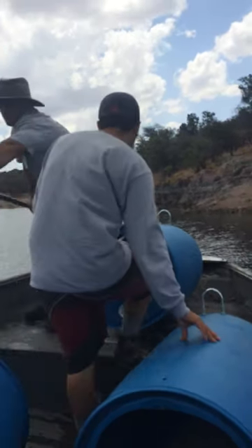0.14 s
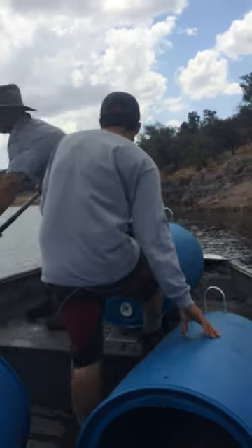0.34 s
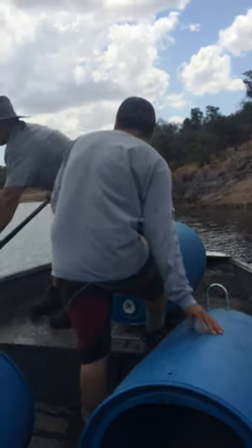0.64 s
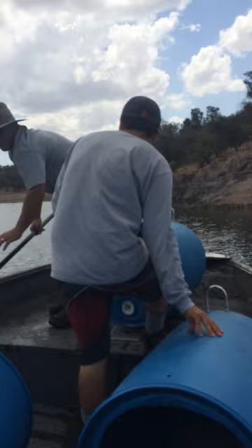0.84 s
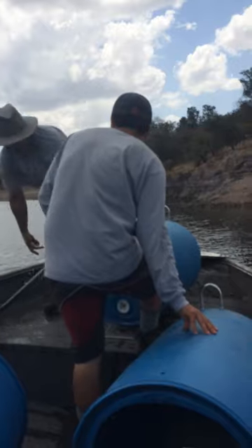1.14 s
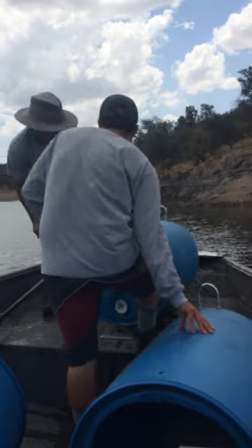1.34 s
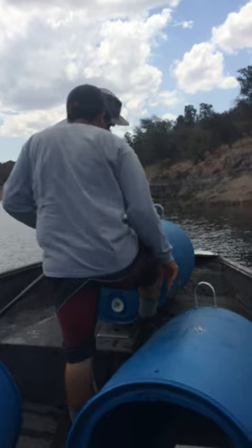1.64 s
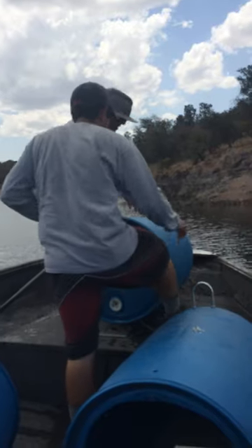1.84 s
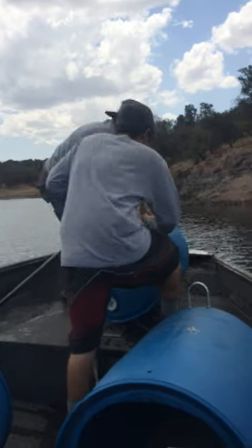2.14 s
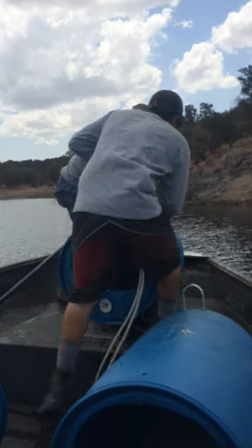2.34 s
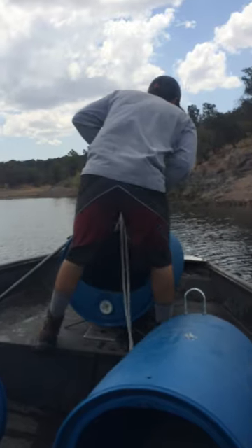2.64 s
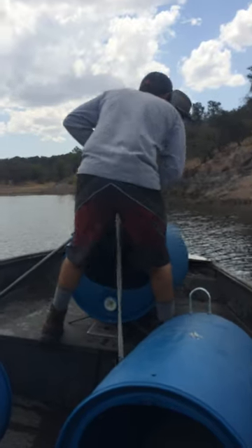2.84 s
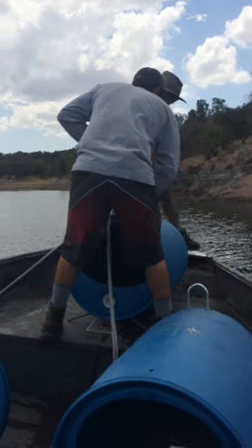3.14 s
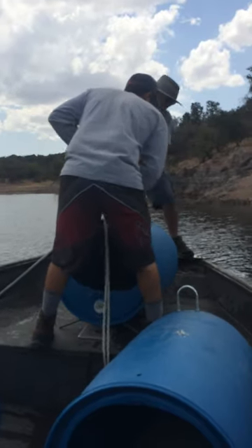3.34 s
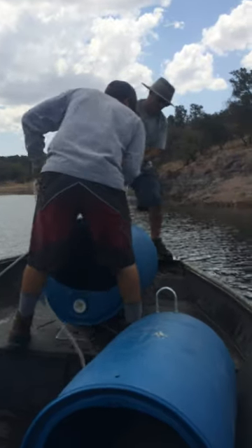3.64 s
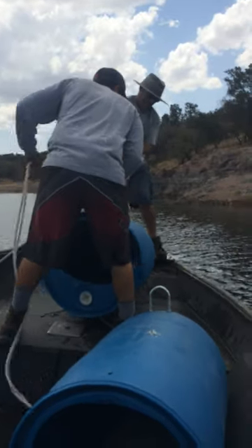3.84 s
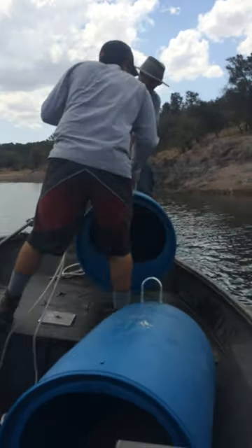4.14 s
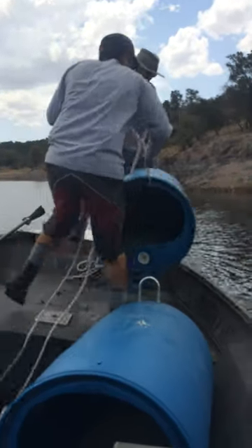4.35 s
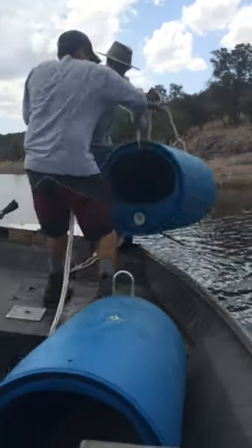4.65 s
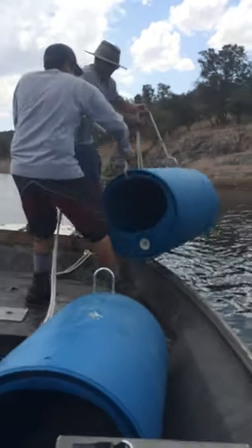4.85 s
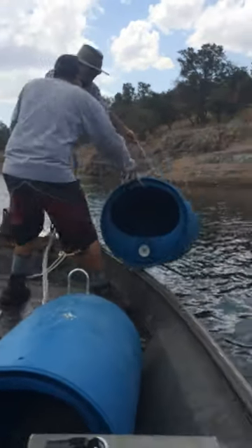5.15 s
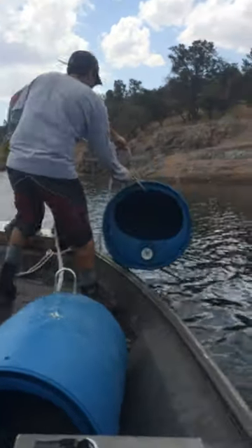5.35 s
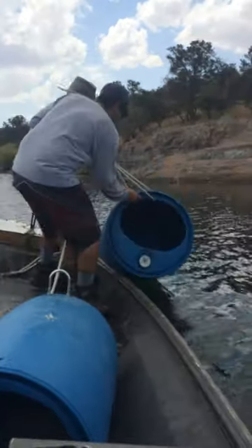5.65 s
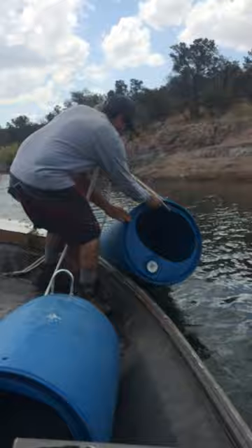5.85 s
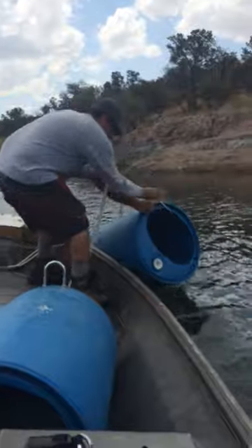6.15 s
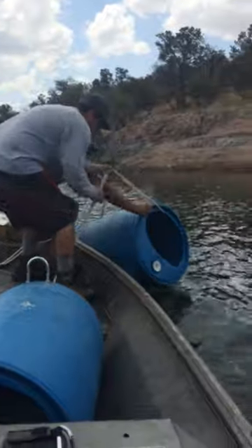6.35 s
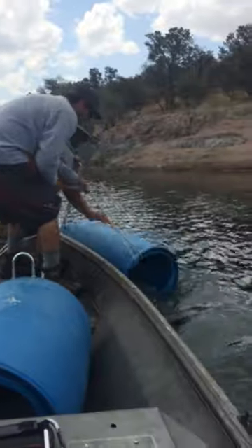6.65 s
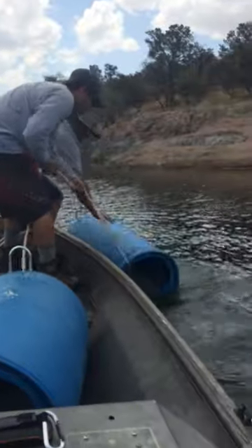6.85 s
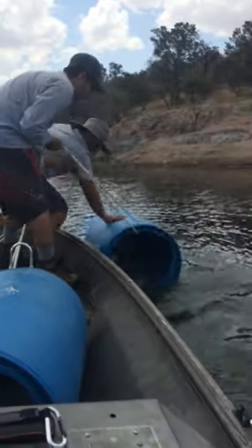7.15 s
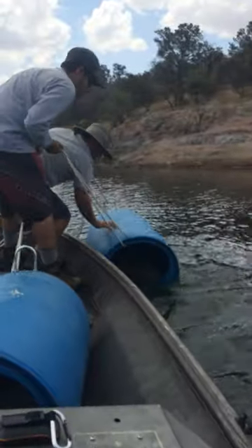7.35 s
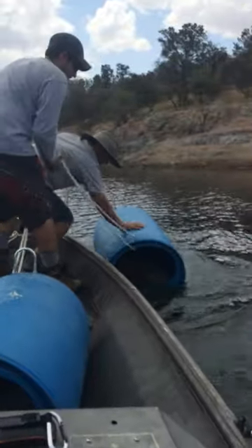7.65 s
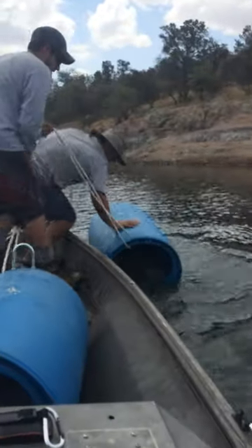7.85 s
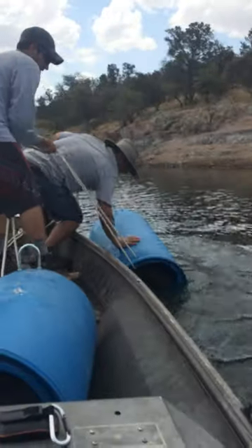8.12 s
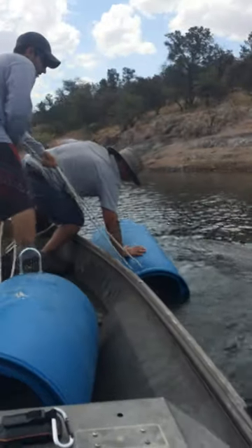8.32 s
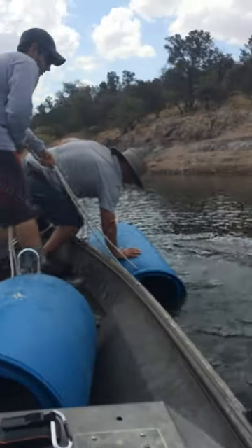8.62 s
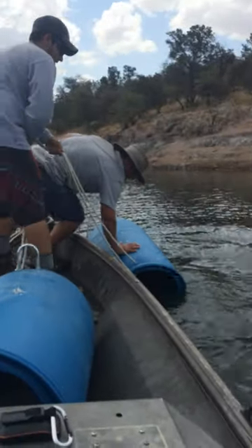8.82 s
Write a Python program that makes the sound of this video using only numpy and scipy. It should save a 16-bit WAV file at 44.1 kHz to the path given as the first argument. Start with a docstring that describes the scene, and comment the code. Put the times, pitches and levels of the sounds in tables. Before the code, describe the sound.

Very close, dry outdoor sound aboard a small metal boat. From 0 to 1.6 seconds, soft low thumps and deck rubbing surround hard hollow knocks, the strongest near 0.5 and 1.3, with short groans of dragged plastic near 0.9 and 1.4. From 1.7 to 3.6 it is much quieter: faint shuffles, taps and scuffs. Thumps gather from 3.7 to 4.9. At 5.0 a loud crack and deep boat boom begin gritty scraping, with another bang around 5.15 and thumps at 5.45. Thin squeaks chirp from 5.6 to 5.9; slow juddering slips begin at 6.0 and quicken to a rough squeal and sharp knock around 6.4. Water follows: small slaps and gurgling bubbles, strongest from 6.8 to 7.2, weaker at 7.5 and 7.7. Soft lapping, tiny ripple ticks and a wavering low hum remain until 9 seconds.

```python
"""A hollow plastic drum bangs and drags over a small metal boat as two people heave it into a lake.
Hard knocks and soft thumps set drum and hull ringing; friction, built from many tiny random clicks,
makes the drags, scuffs and scrapes; repeated slips judder on the gunwale, the boat's upper edge.
Then coloured noise and ringing bubbles splash and lap, over hull rumble and a low wavering hum."""
import sys
import numpy as np
from scipy import signal
from scipy.fft import rfft, irfft, next_fast_len
from scipy.io import wavfile
from scipy.ndimage import uniform_filter1d

SR = 44100
rng = np.random.default_rng(int(sys.argv[2]) if len(sys.argv) > 2 else 0)


def bounce(signal):
    """Save signal as a 16-bit WAV file at the path given by the first command-line argument."""
    frames = np.transpose(np.atleast_2d(signal))
    limited = np.clip(frames, -1, 1)
    pcm = np.round(limited * 32767).astype(np.int16)
    wavfile.write(sys.argv[1], SR, pcm)


N = 396018
TIME = np.arange(N) / SR  # seconds

# In every table t60_s is the time to fade by 60 dB, and levels are set before the trims in the functions.


def from_db(db):
    """Decibels to gain."""
    return 10 ** (np.asarray(db) / 20)


def rms_one(x):
    """Scale to an rms (average strength) of 1."""
    return x / np.sqrt(np.mean(x ** 2) + 1e-20)


def in_time(rows):
    """Each column of a curve, read at every sample."""
    s, *columns = np.transpose(rows)
    return [np.interp(TIME, s, c) for c in columns]


def during(rows):
    """1 while a curve lasts, 0 outside, with soft edges."""
    lasting = (TIME >= rows[0][0]) & (TIME <= rows[-1][0])
    return uniform_filter1d(1.0 * lasting, size=400)


def add(out, s, sound):
    """Mix a sound in at time s."""
    i = max(0, round(s * SR))
    out[i:i + len(sound)] += sound[:N - i]


def fade(t, t60):
    """Exponential decay, as a ringing object loses its energy."""
    return np.exp(-np.log(1000) * t / t60)


def drift(rate):
    """Smooth random wandering of rms 1; a higher rate wanders faster."""
    r = np.exp(-80 * np.pi * rate / SR)  # made at every 40th sample
    slow = signal.lfilter([1], [1, -2 * r, r * r], rng.standard_normal(N // 40 + 2002))[2000:]
    return np.interp(np.arange(N) / 40, np.arange(len(slow)), rms_one(slow))


def colour(x, spectrum):
    """Give a steady sound a spectrum with steep skirts; rms 1."""
    hz, db = np.transpose(spectrum)
    size = next_fast_len(len(x))
    octave, points = np.log2(np.fft.rfftfreq(size, 1 / SR) + 1), np.log2(hz)
    outside = np.abs(octave - np.clip(octave, points[0], points[-1]))
    gain = from_db(np.interp(octave, points, db) - 24 * outside)
    return rms_one(irfft(rfft(x, size) * gain, size)[:len(x)])


def ring(clicks, hz, t60):
    """Each unit click sets a sine of height 1 ringing."""
    r, w = from_db(-60 / (t60 * SR)), 2 * np.pi * hz / SR
    return signal.lfilter([0, np.sin(w)], [1, -2 * r * np.cos(w), r * r], clicks + 1e-18)


def grains(per_s, spread_db):
    """Random tiny clicks of uneven size and either sign."""
    sizes = from_db(spread_db * np.minimum(rng.exponential(1, N), 4)) * rng.choice([-1, 1], N)
    return sizes * (rng.random(N) < per_s / SR)


def patchy(x, depth_db, rate):
    """Half-octave bands swell and sink on their own, as contacts and droplets come and go."""
    size = next_fast_len(N)
    spectrum = rfft(x, size)
    place = 2 * np.log2(np.clip(np.fft.rfftfreq(size, 1 / SR) / 250, 1, 64))
    bands = (irfft(spectrum * np.maximum(0, 1 - np.abs(place - k)), size)[:N] for k in range(13))
    return rms_one(sum(band * from_db(depth_db * drift(rate)) for band in bands))


def friction(spectrum, per_s, spread_db, chatter_db, patchy_db):
    """Rubbing is many small catches, whose strength wanders."""
    catches = grains(per_s, spread_db) * from_db(chatter_db * drift(30.5))
    return patchy(colour(catches, spectrum), patchy_db, rate=18)


def strokes(rows, attack_s, release_t60):
    """Each row swells, holds for its length and dies away; one gain curve per level column."""
    out, t = np.zeros((len(rows[0]) - 2, N)), TIME[:SR]
    for s, length, *db in rows:
        shape = np.minimum(t / attack_s, 1) * fade(np.maximum(t - length, 0), release_t60)
        i = max(0, round(s * SR))
        out[:, i:i + SR] = np.maximum(out[:, i:i + SR], from_db(db)[:, None] * shape[:N - i])
    return out


# hard knocks: start_s, crack_db, boom_db, clang_db, ring_length (a factor)
HARD_KNOCKS = [(0.4656, -4, -8, -16.5, 1.0), (0.634, -23.5, -20.5, -30, 0.62),
               (1.0077, -23.5, -16, -25.5, 0.69), (1.1582, -32, -48, -68, 0.7),
               (1.2658, -4.5, -15, -14.5, 0.73), (1.2849, -10.5, -12, -42, 0.61),
               (1.3945, -25.5, -22, -31, 0.91), (1.5386, -13.5, -18.5, -21, 0.72),
               (1.5584, -19.5, -27, -33.5, 0.74), (2.0342, -35.5, -36.5, -49.5, 1.0),
               (2.8236, -27.5, -36, -30, 0.34), (2.969, -38, -57, -32.5, 0.26),
               (3.3456, -30.5, -64, -49.5, 0.54), (3.6349, -37, -41.5, -50, 0.94),
               (3.712, -26.5, -31.5, -32, 0.49), (3.8226, -28.5, -29.5, -35.5, 0.39),
               (3.957, -29, -65, -41, 0.5), (4.6704, -42, -40, -36.5, 0.63), (5.0109, -17, -17, -29, 0.87),
               (5.0225, -6, -27, -16, 0.24), (5.1463, -13, -10, -15.5, 0.38), (5.4472, -30, -20, -33, 1),
               (6.4222, -9, -27, -20.5, 0.55)]
# sound colours of the hollow boom, the clang and the crack: pitch_hz, level_db
HOLLOW_COLOUR = [(110, -28), (200, 0), (340, 2.5), (520, -17)]
CLANG_COLOUR = [(300, -14.5), (480, -7), (750, -1.5), (1150, -8), (1450, -5), (1900, -12), (2600, -22)]
CRACK_COLOUR = [(1400, 8), (2400, -7), (3200, 7.5), (4200, 8.5), (6500, 6.5), (10000, 0), (15500, -6.5)]


def knocks(boom_db=-2.0, clang_db=2.0, crack_db=-11.5, clang_t60=0.22, crack_t60=0.037,
           buzz_db=-5.5, buzz_t60=0.18, hollow_db=-3.5, hollow_t60=0.32):
    """Drum on metal: a sharp crack, a short buzz, the clang of dense modes and a hollow low boom."""
    out, t = np.zeros(N), TIME[:SR // 2]
    for s, crack, boom, clang, length in HARD_KNOCKS:
        white = rng.standard_normal((3, len(t)))
        hollow_shape = fade(t, hollow_t60 * length) * (1 - fade(t, 0.026))
        add(out, s, from_db(boom + hollow_db) * colour(white[2], HOLLOW_COLOUR) * hollow_shape)
        clang_shape = fade(t, clang_t60 * length) * (1 - fade(t, 0.0091))
        add(out, s, from_db(clang + clang_db) * colour(white[0], CLANG_COLOUR) * clang_shape)
        snap = fade(t, crack_t60 * length) + from_db(buzz_db) * fade(t, buzz_t60 * length)
        snap = snap * (1 - fade(t, 0.0066))
        add(out, s, from_db(crack + crack_db) * colour(white[1], CRACK_COLOUR) * snap)
    times, _, booms = np.transpose(HARD_KNOCKS)[:3]
    return out + body(times, from_db(booms + boom_db), soft_hz=3000, detune=0.0073)


# soft thumps of feet and drum wall: start_s, level_db, pitch_hz, pop_db, pop_pitch_hz
SOFT_THUMPS = [(0.03, -14.5, 91.5, -22, 370), (0.072, -18, 57, -39, 347), (0.099, -18.5, 168, -20.5, 330),
               (0.271, -20.5, 107, -48, 347), (0.338, -21, 131, -47, 347), (0.628, -10.5, 152, -17.5, 356),
               (0.784, -15.5, 179, -27, 383), (0.805, -23, 80.4, -27, 314), (0.886, -15, 147, -30, 355),
               (0.916, -13.5, 110, -31, 331), (0.946, -15, 115, -28, 392), (1.021, -9.5, 243, -26, 331),
               (1.081, -17.5, 213, -23.5, 331), (1.32, -17, 94, -37, 345), (1.436, -28, 228, -19.5, 328),
               (1.861, -21, 85.5, -38, 363), (1.924, -22, 103, -31, 410), (2.057, -28, 71, -42, 331),
               (2.1, -28, 105, -37, 346), (2.351, -33, 78, -52, 579), (2.554, -29, 128, -49, 390),
               (3.094, -29, 234, -31, 400), (3.188, -29.5, 70, -37, 334), (3.24, -34, 110, -45, 382),
               (3.51, -28, 135, -33, 358), (3.633, -25, 99, -45, 380), (3.772, -18, 155, -29, 420),
               (3.793, -42, 85, -27, 417), (3.88, -40, 81, -26.5, 353), (3.93, -22.5, 92, -25.5, 334),
               (4.022, -25.5, 109, -40, 670), (4.192, -17.5, 99, -22, 377), (4.232, -19.5, 180, -33, 333),
               (4.353, -26.5, 81, -34, 470), (4.406, -28, 72, -25.5, 390), (4.45, -20, 101, -31, 371),
               (4.523, -16, 148, -46, 339), (4.564, -17, 124, -32, 380), (4.601, -14, 120, -17.5, 479),
               (4.621, -26, 222, -37, 493), (4.691, -23.5, 119, -23.5, 504), (4.854, -25.5, 85.5, -34, 365),
               (5.046, -10.5, 85.4, -16, 630), (5.08, -13, 57, -28, 366), (5.46, -11, 107, -21, 377),
               (5.574, -21, 258, -23.5, 357), (5.664, -26, 125, -30, 623), (6.404, -13.5, 158, -28, 318),
               (6.473, -25, 83, -40, 333), (6.518, -27, 80, -37, 557), (7.21, -30, 127, -48, 400),
               (7.527, -24.5, 112, -49, 541), (7.70, -23, 98, -51, 330)]


def thumps(push_db=5.0, cycles=7.0, ring_db=-10.5, pop_db=12.5, pop_cycles=6.55, pop_lag=0.00483):
    """A soft blow pushes the panel for a few cycles and wakes low modes; the wall gives a hollow pop."""
    out, t = np.zeros(N), TIME[:SR // 4]
    for s, db, hz, pop, pop_hz in SOFT_THUMPS:
        push = np.sin(2 * np.pi * hz * t) * fade(t, cycles / hz) * (1 - fade(t, 1 / hz))
        add(out, s, from_db(db + push_db) * push)
        swell = (1 - fade(t, 2 / pop_hz)) ** 3
        hollow_pop = np.sin(2 * np.pi * pop_hz * t) * fade(t, pop_cycles / pop_hz) * swell
        add(out, s + pop_lag, from_db(pop + pop_db) * hollow_pop)
    times, levels = np.transpose(SOFT_THUMPS)[:2]
    return out + body(times, from_db(levels + ring_db), soft_hz=224)


# drum and hull ringing together, before each blow retunes them: pitch_hz, level_db, t60_s
BODY_MODES = [(68, -15, 0.51), (103.5, -16, 0.97), (140.6, -12, 0.42), (184.6, -6, 0.38),
              (207.7, -6.5, 0.24), (266.1, -7, 0.31), (306.2, -3, 0.28), (329.2, -8.5, 0.2),
              (440, -20.5, 0.32), (483, -17, 0.12), (594.4, -8.5, 0.15), (710, -16.5, 0.23),
              (764, -14, 0.18), (1000, -21.5, 0.26), (1340, -22, 0.12), (1608, -18.5, 0.026),
              (2400, -17, 0.09), (3080, -30, 0.28), (3700, -17, 0.089), (4000, -44, 0.14),
              (5700, -23, 0.15), (6150, -13, 0.15)]


def body(times, gains, soft_hz, detune=0.04):
    """Blows ring the modes, each randomly retuned a little; a soft contact spares the high ones."""
    out, t = np.zeros(N), TIME[:SR // 3].astype(np.float32)
    hz, db, t60 = np.transpose(BODY_MODES)
    heard = hz < 4 * soft_hz
    softened = from_db(db) / np.hypot(1, (hz / soft_hz) ** 2)
    decays = softened[heard, None] * fade(t, t60[heard, None])
    for s, gain in zip(times, gains):
        strength, shift = rng.standard_normal((2, len(BODY_MODES)))
        pitch = (2 * np.pi * hz * (1 + detune * shift))[heard, None].astype(np.float32)
        weights = (from_db(3 * strength) * (-1) ** np.arange(len(hz)))[heard]
        add(out, s, gain * weights @ (np.sin(pitch * t) * decays))
    return out


# pulls of the drum over the deck: start_s, length_s, rub_db, hiss_db
DECK_DRAGS = [(0.0, 0.15, -40, -47.5), (0.137, 0.11, -47, -49), (0.254, 0.26, -43.5, -49.5),
              (0.473, 0.05, -28.5, -45), (0.789, 0.11, -51, -45.5), (0.861, 0.07, -34, -39.5),
              (.95, 0.082, -30, -46.5), (1.1, 0.2, -49, -55.5), (1.28, 0.15, -42, -44.5),
              (1.427, 0.074, -31.5, -52), (1.686, 0.27, -44.5, -55.5), (2.476, 0.22, -44, -59.5),
              (2.79, 0.35, -47, -57.5), (3.74, 0.24, -40.5, -56.5), (3.97, 0.16, -47.5, -57.5),
              (4.177, 0.29, -54, -66)]
DRAG_ATTACK_S, DRAG_RELEASE_T60_S = 0.018, 0.35
# quiet stirring of feet and rope: time_s, rub_db, hiss_db
QUIET_STIR = [(0, -54, -69), (2.2, -52, -62), (5.0, -55.5, -73.5)]
# sound colours of the dull rub and the bright hiss: pitch_hz, level_db
RUB_COLOUR = [(150, -34), (250, 6.5), (412, 2.5), (835, -4.5), (956, -9), (1770, -15), (1960, -35),
              (3000, -67.5), (3900, -53), (6600, -120)]
HISS_COLOUR = [(1100, 3), (1900, -5.5), (3800, -2), (5200, -7), (7500, -8), (11000, -16.5), (15500, -20)]


def shuffling(rub_db=0.0, hiss_db=0.0):
    """Shoes, rope and plastic rub over the deck, louder during each pull."""
    stirring = from_db(in_time(QUIET_STIR)) * during(QUIET_STIR)
    rub, hiss = np.maximum(strokes(DECK_DRAGS, DRAG_ATTACK_S, DRAG_RELEASE_T60_S), stirring)
    rubbing = friction(RUB_COLOUR, per_s=2500, spread_db=-2.5, chatter_db=5.0, patchy_db=0.5)
    hissing = friction(HISS_COLOUR, per_s=8000, spread_db=1.0, chatter_db=2.5, patchy_db=3.5)
    return rub * from_db(rub_db) * rubbing + hiss * from_db(hiss_db) * hissing


# groans of the dragged drum, sagging in pitch: start_s, length_s, start_pitch_hz, end_pitch_hz, level_db
DRUM_GROANS = [(0.939, 0.0828, 435, 291, -19.5), (1.423, 0.091, 318, 299, -25)]
GROAN_ATTACK_S, GROAN_RELEASE_T60_S = 0.012, 0.054


def groans(waver=0.021, flutter_db=3.0, octave_db=-21.0):
    """The drum wall sticks and slips on the deck in a rough, sagging tone."""
    out, wobble = np.zeros(N), 1 + waver * drift(82)
    for s, length, start_hz, end_hz, db in DRUM_GROANS:
        pitch = np.interp(TIME, [s, s + length], [start_hz, end_hz]) * wobble
        phase = 2 * np.pi * np.cumsum(pitch) / SR
        gain, = strokes([(s, length, db)], GROAN_ATTACK_S, GROAN_RELEASE_T60_S)
        out += gain * (np.sin(phase) + from_db(octave_db) * np.sin(2 * phase))
    return out * from_db(flutter_db * drift(67))


# short scuffs of shoe, rope and drum: start_s, length_s, level_db, centre_hz
SHORT_SCUFFS = [(0.051, 0.04, -38, 5970), (0.072, 0.039, -42, 750), (0.14, 0.069, -48.5, 3960),
                (0.354, 0.043, -38.5, 4400), (0.359, 0.038, -38, 800), (0.441, 0.013, -41, 7500),
                (0.606, 0.031, -37.5, 4000), (0.624, 0.073, -44, 6000), (0.779, 0.031, -39.5, 635),
                (0.869, 0.18, -32, 322), (1.729, 0.03, -49, 3650), (2.495, 0.078, -43.5, 1890),
                (2.626, 0.053, -54.5, 1790), (2.814, 0.031, -41, 1220), (2.963, 0.019, -37, 1000),
                (3.7, 0.037, -39, 1500), (3.724, 0.054, -33, 420), (3.851, 0.033, -45, 2400),
                (3.908, 0.038, -37, 447), (4.03, 0.11, -49.5, 960), (4.043, .07, -58.5, 8000),
                (4.135, 0.35, -61, 11900), (4.663, 0.045, -47.5, 2600), (4.77, .15, -60.5, 11000),
                (5.149, 0.019, -17.5, 637)]


def scuffs():
    """Each scuff is a quick swell of gritty friction."""
    out, grit = np.zeros(N), grains(per_s=5500, spread_db=4.5)
    for s, length, db, hz in SHORT_SCUFFS:
        stroke = grit[round(s * SR):round((s + length) * SR)]
        spectrum = [(hz / 3, -6), (hz, 0), (hz * 2, -7), (hz * 8, -26), (hz * 40, -50)]
        add(out, s, from_db(db) * colour(stroke, spectrum) * signal.windows.tukey(len(stroke), .6))
    return out


# scrapes of drum and rope along the side: start_s, length_s, grind_db, rasp_db
SIDE_SCRAPES = [(5.018, 0.021, -17, -22.5), (5.052, .058, -17.5, -19), (5.136, 0.0088, -13, -16),
                (5.174, 0.019, -18, -19.5), (5.21, 0.027, -21, -25), (5.26, 0.071, -27, -32),
                (5.33, 0.043, -28, -38.5), (5.45, 0.03, -24, -37), (5.472, 0.047, -26, -29),
                (5.592, 0.02, -25, -34.5), (5.636, 0.031, -26.5, -32.5), (5.69, 0.071, -29, -44),
                (5.82, 0.092, -39.5, -55.5), (5.925, 0.071, -33.5, -54.5), (6.018, 0.024, -28, -44),
                (6.069, 0.0087, -26, -32.5), (6.118, 0.01, -24, -34), (6.178, 0.013, -26.5, -33),
                (6.22, 0.069, -27, -42), (6.288, 0.016, -21, -35), (6.335, 0.073, -17, -33)]
SCRAPE_ATTACK_S, SCRAPE_RELEASE_T60_S = 0.0044, 0.24
# sound colours of the low grind and the bright rasp: pitch_hz, level_db
GRIND_COLOUR = [(130, -26), (220, -4.5), (290, -2), (430, -7.5), (580, -5), (750, -11.5), (1150, -14.5),
                (1500, -14.5), (2300, -19.5), (4000, -22.5), (8000, -39)]
RASP_COLOUR = [(1100, 5), (1900, -4.5), (3000, -5), (4700, -2), (6500, 1.5), (9000, -3), (12000, -6),
               (15500, -23)]
# booms of the whole boat: start_s, length_s, level_db
BOAT_BOOMS = [(5.016, 0.013, -8.5), (5.13, 0.095, -18.5)]
BOOM_ATTACK_S, BOOM_RELEASE_T60_S = 0.0081, 0.37


def scraping(grind_db=-3.5, rasp_db=-2.5):
    """The drum grinds down the side in separate scrapes, and the boat booms as low noise."""
    grind, rasp = strokes(SIDE_SCRAPES, SCRAPE_ATTACK_S, SCRAPE_RELEASE_T60_S)
    grinding = friction(GRIND_COLOUR, per_s=2500, spread_db=2.5, chatter_db=1.5, patchy_db=1.5)
    rasping = friction(RASP_COLOUR, per_s=9000, spread_db=2.5, chatter_db=1.8, patchy_db=1.0)
    swell, = strokes(BOAT_BOOMS, BOOM_ATTACK_S, BOOM_RELEASE_T60_S)
    boom_colour = [(32, -18), (48, 5.5), (70, 12.0), (110, 7), (250, -7.5)]
    boom = swell * colour(rng.standard_normal(N), boom_colour)
    return grind * from_db(grind_db) * grinding + rasp * from_db(rasp_db) * rasping + boom


# plastic squeaks against metal: start_s, length_s, start_pitch_hz, end_pitch_hz, level_db
PLASTIC_SQUEAKS = [(.80, 0.024, 5000, 7340, -64), (0.854, 0.031, 6100, 7400, -34.5),
                   (1.469, 0.038, 1050, 930, -32), (5.598, 0.043, 1660, 1460, -29.5),
                   (5.601, 0.049, 3150, 2800, -33), (5.622, 0.046, 1895, 2080, -40),
                   (5.694, 0.049, 2150, 2950, -34), (5.711, 0.014, 1640, 1380, -32),
                   (5.76, 0.048, 1600, 1340, -51), (5.832, 0.0088, 2300, 3230, -40),
                   (5.846, 0.012, 2210, 3000, -39), (5.867, 0.014, 2160, 2900, -39),
                   (5.886, 0.058, 2360, 2060, -41.5), (6.329, 0.088, 985, 656, -17),
                   (6.36, 0.1, 499, 525, -18)]


def squeaks(flutter_db=-1.5, octave_db=-19.0):
    """Fast stick and slip gives a rough gliding tone with its octave."""
    out, flutter = np.zeros(N), drift(300)
    wobble = 1 + .085 * drift(500)
    for s, length, start_hz, end_hz, db in PLASTIC_SQUEAKS:
        span = np.arange(round(s * SR), round((s + length) * SR))
        pitch = np.geomspace(start_hz, end_hz, len(span)) * wobble[span]
        phase = 2 * np.pi * np.cumsum(pitch) / SR
        tone = np.sin(phase) + from_db(octave_db) * np.sin(2 * phase)
        add(out, s, from_db(db + flutter_db * flutter[span]) * np.hanning(len(span)) * tone)
    return out


# stick and slip over the gunwale: time_s, slips_per_s, level_db
GUNWALE_SLIPS = [(5.997, 20.8, -13), (6.047, 17.1, -16), (6.1, 19, -18.5), (6.15, 27.2, -21.5),
                 (6.218, 44, -21.5), (6.279, 63.7, -19.5), (6.39, 130, -26.5), (6.429, 130, -25.5),
                 (6.472, 75, -45)]
# drum wall pressed on the gunwale: pitch_hz, level_db, t60_s
WALL_MODES = [(111.4, -12.5, 0.74), (177, 1, 0.11), (307, -1.5, 0.087), (504, 6.5, 0.05), (630, 4, 0.036),
              (800, -1, 0.066), (1050, -5, 0.03), (1400, -1.5, 0.088), (2035.5, 1, 0.019),
              (3070, 2.5, 0.033), (3530, 5.5, 0.039)]
# faster slips are brighter: base value, and its rise for each slip per second
SLIP_BRIGHT_HZ, SLIP_BRIGHT_RISE_HZ = 139, 12.1


def judder(slip_db=-0.5, uneven_db=4.0, rasp_db=-20.0):
    """Slips quicken and weaken overall as the drum tips over; each rings the wall and rasps briefly."""
    s, rate, db = np.transpose(GUNWALE_SLIPS)
    bright_hz = SLIP_BRIGHT_HZ + SLIP_BRIGHT_RISE_HZ * rate
    out, clicks, now, t = np.zeros(N), np.zeros((len(WALL_MODES), N)), s[0], TIME[:SR // 20]
    wall_hz = np.array(WALL_MODES)[:, 0]
    chance = rng.standard_normal((120, len(WALL_MODES) + 1))  # at most 120 slips
    white = rng.standard_normal((120, len(t)))
    for row, grit in zip(chance, white):
        if now > s[-1]:
            break
        level, edge_hz = np.interp(now, s, db), np.interp(now, s, bright_hz)
        strength = from_db(level + slip_db + uneven_db * row[1:])
        clicks[:, round(now * SR)] = strength / np.hypot(1, (wall_hz / edge_hz) ** 2)
        rasp = colour(grit, [(300, -5), (edge_hz, 0), (2 * edge_hz, -12), (16000, -42)])
        add(out, now, from_db(level + rasp_db) * rasp * fade(t, .035))
        # slightly uneven gaps, never under 3 ms
        now += max((1 + .04 * row[0]) / np.interp(now, s, rate), .003)
    for k, (hz, level, t60) in enumerate(WALL_MODES):
        out += (-1) ** k * from_db(level) * ring(clicks[k], hz, t60)
    return out


# waves pushed out by the bobbing drum: start_s, length_s, slosh_db, spray_db
DRUM_WAVES = [(6.525, 0.02, -43, -48.5), (6.68, 0.036, -45, -50), (6.745, 0.096, -42, -46),
              (6.84, 0.069, -37.5, -51), (6.99, 0.093, -42, -42), (7.085, 0.044, -36, -48.5),
              (7.47, 0.064, -40.5, -42.5), (7.58, 0.048, -53, -47.5), (7.69, 0.05, -45, -49.5),
              (7.84, 0.1, -47.5, -53)]
WAVE_ATTACK_S, WAVE_RELEASE_T60_S = 0.016, 0.61
# steady lapping once the drum is afloat: time_s, slosh_db, spray_db
STEADY_LAPPING = [(6.5, -53, -54.5), (8.1, -50, -56), (8.98, -44, -52)]
# sound colours of the slosh and the fine spray: pitch_hz, level_db
SLOSH_COLOUR = [(150, -12), (250, 12.5), (438, -7), (545, 0.5), (862, -3.5), (1330, -1.5), (1730, -10.5),
                (2270, -21.5), (3000, -39), (3900, -38), (6600, -120)]
SPRAY_COLOUR = [(1060, -8), (1800, -4), (3030, -6.5), (3670, -5.5), (5390, -10.5), (11800, -11),
                (15300, -20), (16000, -40)]
# slaps of water: start_s, level_db, centre_hz, t60_s
WATER_SLAPS = [(6.542, -11.5, 5700, 0.055), (6.865, -14, 590, 0.11), (6.88, -15, 547, 0.071),
               (7.004, -6.5, 1400, 0.094), (7.094, -9.5, 1250, 0.12), (7.112, -7.5, 1400, 0.14),
               (7.131, -8, 1130, 0.1), (7.544, -19, 1690, 0.093), (7.707, -22.5, 2410, 0.12),
               (7.752, -23, 5800, 0.035), (7.986, -21, 5500, 0.026)]


def lake(slosh_db=0.5, spray_db=3.0, slap_db=-16.5):
    """Water slaps the drum as noise bursts, bubbles round it and throws fine spray."""
    lapping = from_db(in_time(STEADY_LAPPING)) * during(STEADY_LAPPING)
    slosh, spray = np.maximum(strokes(DRUM_WAVES, WAVE_ATTACK_S, WAVE_RELEASE_T60_S), lapping)
    wash = colour(rng.standard_normal(N), [(250, 0), (3000, 0)])
    froth = bubbles(per_s=900, cycles=24.0) + .5 * wash
    out = slosh * from_db(slosh_db) * patchy(colour(froth, SLOSH_COLOUR), depth_db=2.5, rate=18)
    droplets = friction(SPRAY_COLOUR, per_s=14000, spread_db=3.0, chatter_db=-0.5, patchy_db=3.5)
    out += spray * from_db(spray_db) * droplets
    t = TIME[:SR // 4]
    for s, db, hz, t60 in WATER_SLAPS:
        splash = colour(rng.standard_normal(len(t)), [(hz / 4, -8), (hz, 0), (hz * 2, -9), (16000, -34)])
        add(out, s, from_db(db + slap_db) * splash * fade(t, t60) * (1 - fade(t, 0.0013)))
    return out


def bubbles(per_s, cycles, count=30):
    """Small bubbles, each ringing a few cycles at one of the pitches that bubble sizes give."""
    born, dealt = grains(per_s, spread_db=0.0), rng.integers(0, count, N)
    pitches = enumerate(np.geomspace(330, 2800, count))
    return rms_one(sum(hz * ring(born * (dealt == k), hz, cycles / hz) for k, hz in pitches))


# larger bubbles: start_s, level_db, start_pitch_hz, t60_s
LARGE_BUBBLES = [(6.76, -48, 410, 0.066), (6.826, -21.5, 245, 0.13), (6.855, -23.5, 560, 0.069),
                 (6.915, -44, 1370, .05), (6.96, -33, 1230, 0.037), (7.165, -43, 1140, .06),
                 (7.2, -34.5, 924, 0.1), (7.225, -37, 840, 0.038), (7.455, -32, 550, 0.063),
                 (7.54, -29, 556, 0.062), (7.548, -27.5, 1700, 0.042), (7.72, -35, 368, 0.069),
                 (8.1, -38, 1050, 0.084), (8.73, -39, 655, 0.2)]


def gurgles(rise=0.14):
    """A trapped pocket of air rings, rising in pitch as it nears the surface."""
    out = np.zeros(N)
    for s, db, hz, t60 in LARGE_BUBBLES:
        t = TIME[:round(t60 * SR)]
        tone = np.sin(2 * np.pi * hz * t * (1 + rise * t / t60))
        add(out, s, from_db(db) * tone * fade(t, t60) * (1 - fade(t, 0.0051)))
    return out


def ripples(per_s=30, tick_db=-51.0, cycles=36.0, count=12, air_db=-64.0):
    """Ripples tick against the hull as tiny high rings, over a faint airy hiss."""
    born, dealt = grains(per_s, spread_db=0.0), rng.integers(0, count, N)
    pitches = enumerate(np.geomspace(2500, 10500, count))
    ticks = sum(ring(born * (dealt == k), hz, cycles / hz) for k, hz in pitches)
    air = colour(rng.standard_normal(N), [(1500, 4), (5000, -8), (11000, -10), (15500, -13)])
    return from_db(tick_db) * ticks + from_db(air_db) * air


# low rumble of the rocking hull: time_s, level_db
HULL_ROCKING = [(0.0, -23.5), (0.32, -42), (0.92, -34.5), (1.52, -41), (3.15, -42), (5.3, -31.5),
                (5.85, -36.5), (6.25, -28.5), (6.8, -43), (8.98, -46.5)]
# sound colour of that rumble: pitch_hz, level_db
HULL_COLOUR = [(13, -40), (22, -29), (43, 4), (91, 10), (214, 2), (267, -3), (308, -24), (342, -20),
               (411, -17.5), (445, -32), (500, -11), (650, -22), (1100, -120)]
# every thump leaves the hull rumbling for a moment
SHAKE_ATTACK_S, SHAKE_T60_S = 0.0063, 0.31
# tones of the low hum, before they waver: pitch_hz, level_db
HUM_TONES = [(80.7, -46), (174, -53), (206, -49), (242.2, -52.5), (500.6, -76)]
# swell of the whole hum: time_s, level_db
HUM_LEVEL = [(0, -9), (6.4, -13), (7.4, -1.5), (8.2, -3), (8.98, -1)]


def hull(rumble_db=-0.5, lumps_db=2.5, shake_db=-10.5):
    """The rocking hull rumbles unevenly, more so after each thump, and a low hum wavers under it."""
    shakes = [(s, SHAKE_ATTACK_S, db + shake_db) for s, db, *_ in SOFT_THUMPS]
    shaken, = strokes(shakes, SHAKE_ATTACK_S, SHAKE_T60_S)
    rocking = from_db(in_time(HULL_ROCKING)[0] + rumble_db + lumps_db * drift(20))
    rumble = np.hypot(rocking, shaken) * colour(rng.standard_normal(N), HULL_COLOUR)
    hum = np.zeros(N)
    for hz, db in HUM_TONES:
        phase = 2 * np.pi * np.cumsum(hz * (1 + 0.0084 * drift(3.06))) / SR
        hum += from_db(db + 2.0 * drift(12.0)) * np.sin(phase)
    return rumble + np.sqrt(2) * from_db(in_time(HUM_LEVEL)[0]) * hum


def scene():
    """Everything is close by, with no echo."""
    boat = knocks() + thumps() + shuffling() + groans() + scuffs() + scraping() + squeaks() + judder()
    water = lake() + gurgles() + ripples()
    return (boat + water + hull())[None]


CUTOFF_HZ = 15500


def record(dry):
    """The microphone loses the deepest bass, rounds the peaks and cuts the top."""
    thin = signal.sosfilt(signal.butter(3, 34, "high", fs=SR, output="sos"), dry)
    rounded = .72 * np.tanh(thin / .72)
    return signal.sosfilt(signal.ellip(10, .2, 80, CUTOFF_HZ, fs=SR, output="sos"), rounded)


dry = scene()
out = record(dry)
bounce(out)
```